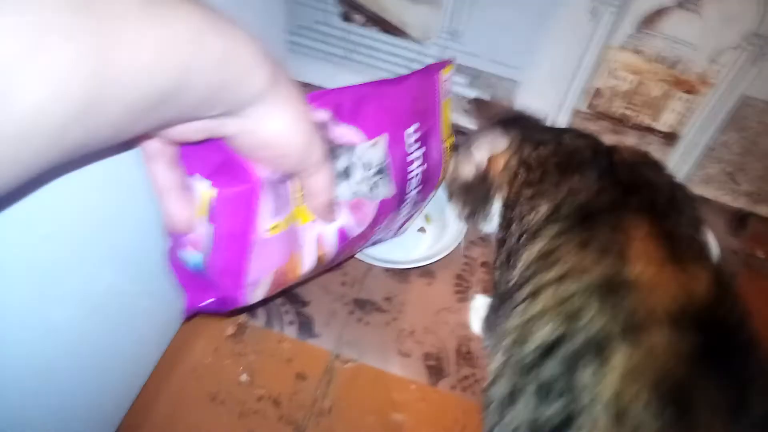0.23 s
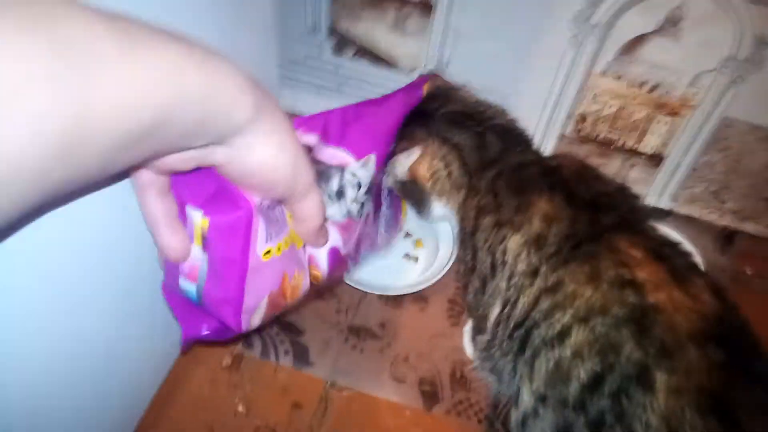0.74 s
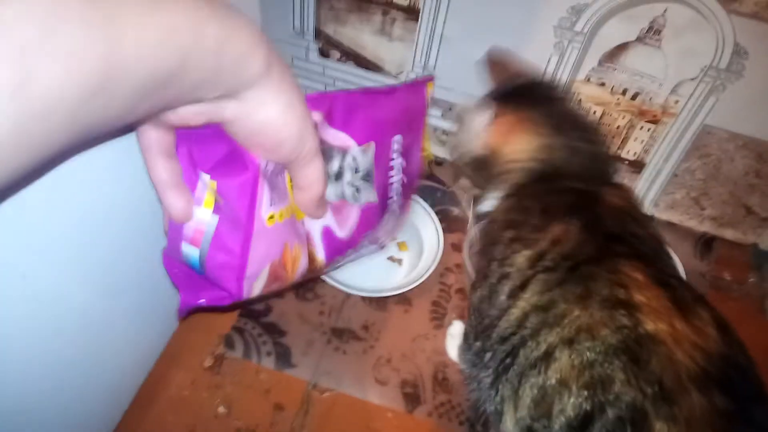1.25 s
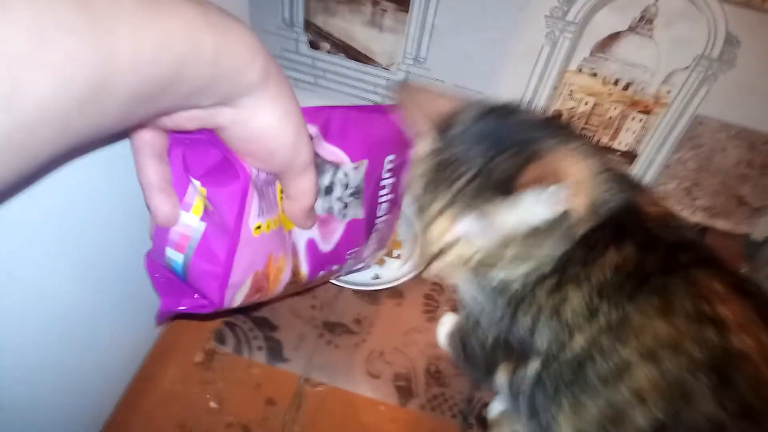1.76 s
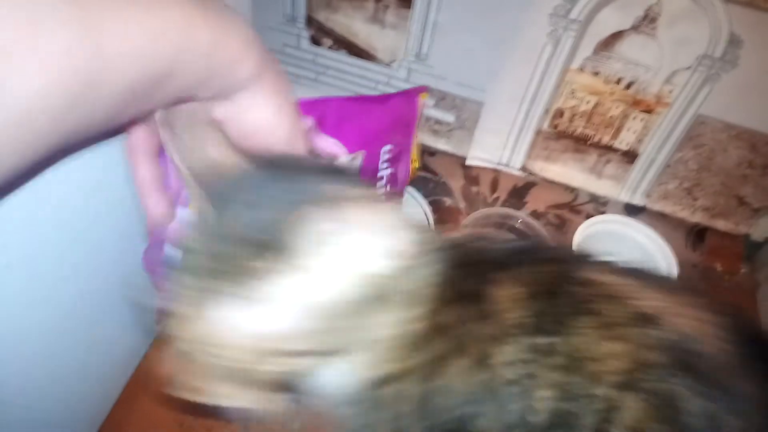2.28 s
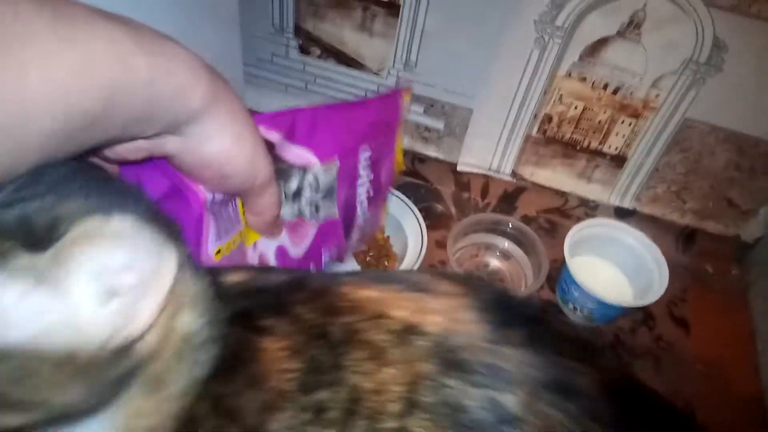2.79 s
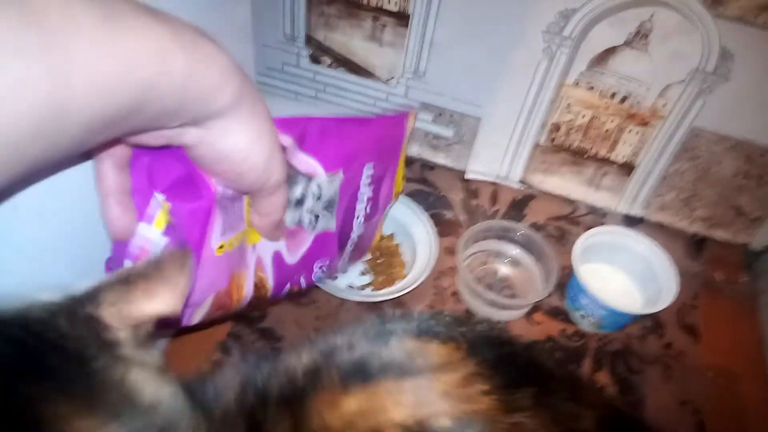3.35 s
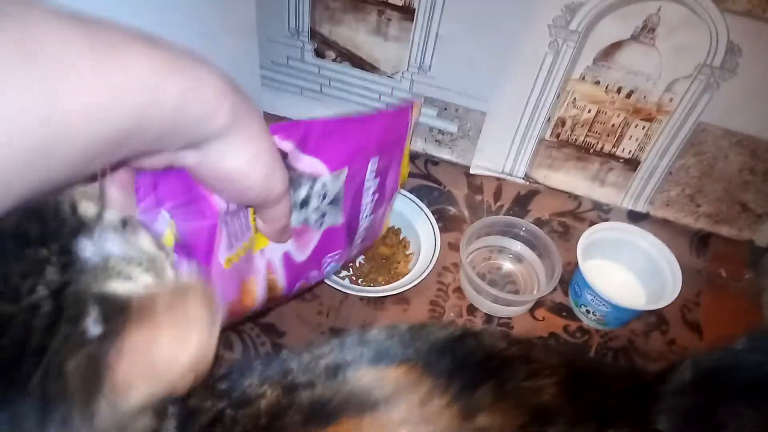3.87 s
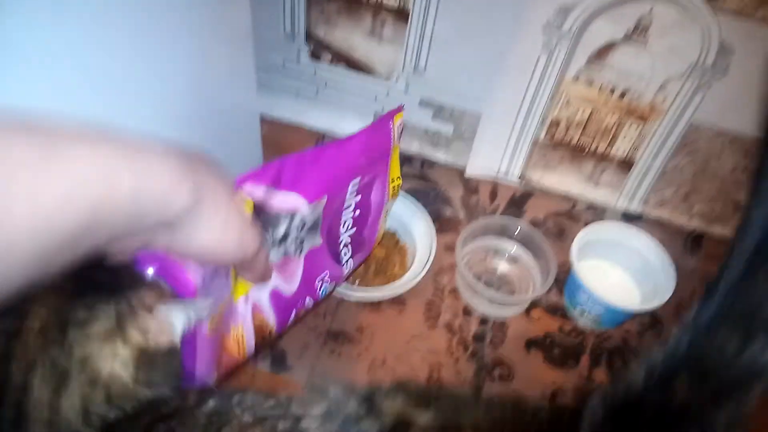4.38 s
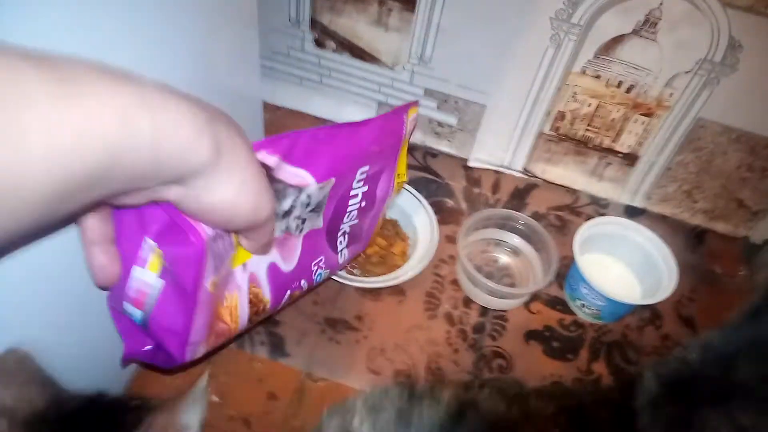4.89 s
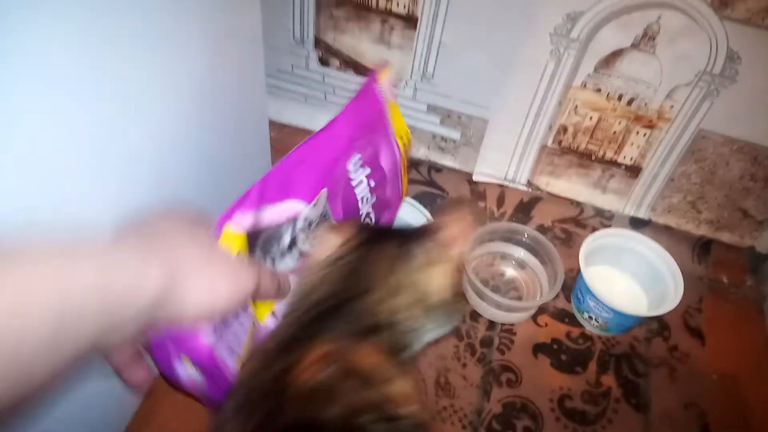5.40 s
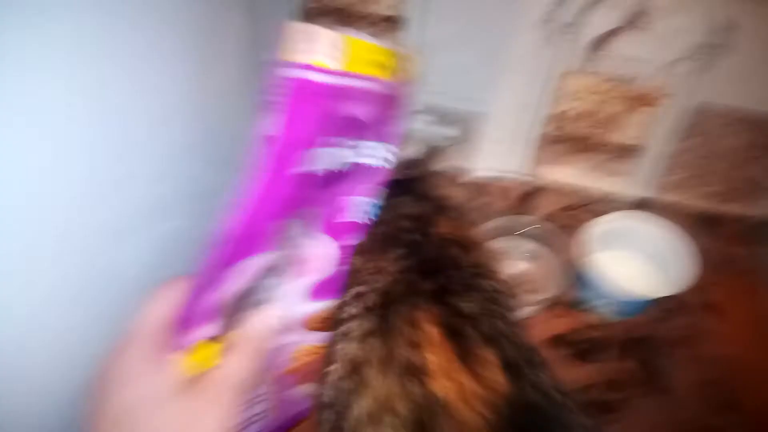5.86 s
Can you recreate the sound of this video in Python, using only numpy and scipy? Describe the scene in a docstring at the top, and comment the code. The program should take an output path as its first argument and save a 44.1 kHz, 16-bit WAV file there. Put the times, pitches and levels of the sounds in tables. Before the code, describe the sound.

Close up in a small quiet room, a plastic pouch of dry cat food is tipped and shaken. Sharp film snaps come first, then kibble slides and rattles in irregular surges while single pellets ping brightly on a china saucer. The densest pour comes just past the middle, with a soft bump after it. Pellets thin out, and the pouch crinkles a few last times as it is lifted.

```python
"""Dry cat food is shaken out of a plastic pouch onto a china saucer in a small room.
Kibble slides along the film as filtered crackle and short knocks; the pouch snaps and crinkles as noise bursts.
Falling pellets ping on the saucer as fading sine tones, and settling ones make fine bright ticks.
The hand rubs the pouch with low noise, and a cat pushing past bumps it with soft low tones."""
import sys
import numpy as np
from scipy import signal
from scipy.fft import rfft, irfft, next_fast_len
from scipy.io import wavfile

SR = 44100
rng = np.random.default_rng(int(sys.argv[2]) if len(sys.argv) > 2 else 0)


def pcm_store(signal):
    """Save signal as 16-bit PCM."""
    levels = np.round(np.clip(np.atleast_2d(signal), -1, 1) * 32767)
    wavfile.write(sys.argv[1], SR, levels.astype(np.int16).T)


N = 270774  # length in samples, about 6.14 s

# Most event and tone levels below are trimmed further by the settings in scene(); the bumps play as typed.
# The quiet room's tone colour. Each row: frequency in Hz, relative level in dB.
AIR_COLOUR = [(25, -14), (50, 0), (110, -0.5), (250, -7), (400, -6.5), (900, -11), (2000, -17), (4500, -16),
              (6200, -21), (8200, -35.5), (12000, -33.5), (15200, -22.5)]
# Each shake sends the kibble sliding; it swells and settles again.
# Each row: crest time in seconds, level in dB, swell time in seconds, settle time in seconds.
SHAKES = [(0.04, -58, 0.25, 0.24), (0.38, -60, 0.33, 0.41), (0.53, -57.5, 0.27, 0.17),
          (0.96, -53, 0.22, .3), (1.12, -49, 0.23, 0.29), (1.32, -49, 0.11, 0.2), (1.5, -48, 0.057, 0.19),
          (1.62, -47.5, 0.086, 0.18), (1.77, -47.5, 0.055, 0.22), (1.89, -40, 0.081, 0.077),
          (2.02, -51.5, 0.2, 0.3), (2.16, -51.5, 0.21, 0.46), (2.44, -53, 0.054, 0.11),
          (2.76, -49, .2, 0.098), (2.88, -57, 0.13, 0.23), (3.13, -44, 0.036, 0.13),
          (3.36, -49.5, 0.083, 0.3), (3.53, -41.5, 0.14, 0.31), (3.78, -51, 0.051, 0.13),
          (3.93, -58, 0.1, 0.35), (4.14, -55, 0.087, 0.34), (4.55, -46.5, 0.086, 0.083),
          (4.66, -48.5, 0.043, 0.099), (4.82, -46, 0.045, 0.27), (5.0, -51.5, 0.037, 0.052),
          (5.14, -52, 0.082, 0.084), (5.53, -63, 0.054, 0.18), (5.8, -50, 0.22, 0.3),
          (6.04, -53, 0.091, 0.073), (6.14, -58.5, 0.041, .1)]
# Tone colour of the sliding kibble. Each row: frequency in Hz, relative level in dB.
KIBBLE_COLOUR = [(300, -15), (600, -12.5), (1000, -7), (1600, 5.5), (2400, 3), (3600, 4.5), (5200, 4),
                 (6300, -6.5), (7200, -19), (8200, -39), (10500, -31.5), (15500, -24)]
# Tone colour of the pouch's hollow rumble. Each row: frequency in Hz, relative level in dB.
HOLLOW_COLOUR = [(150, -27), (280, -13.5), (420, -4), (560, 5.5), (900, 3.5), (1300, 5), (2200, -53.5)]
# The rumble changes as the pouch is tipped and righted.
# Each row: time in seconds, rumble level in dB relative to the flow of kibble.
POUCH_HOLLOWNESS = [(0, -6), (1.25, -7), (2.0, -12.5), (2.7, -7.5), (3.55, -11.5), (4.0, -14.5),
                    (4.7, -13.5), (5.15, -24), (5.6, -3), (6.14, 1)]
# Handfuls land on the food in the saucer.
# Each row: crest time in seconds, level in dB, swell time in seconds, settle time in seconds.
SPILLS = [(1.87, -66, 0.062, .15), (2.06, -68, .09, 0.16), (3.42, -59, .07, 0.27), (3.58, -55, 0.074, 0.3),
          (4.95, -69, 0.14, 0.46)]
# Tone colour of pellets ticking on the saucer. Each row: frequency in Hz, relative level in dB.
TICK_COLOUR = [(5000, -20), (7000, -3), (8200, -26), (10200, -21.5), (11300, -13.5), (13500, -11),
               (15250, -2), (15550, -14), (15900, -15)]
# The hand shifts its grip. Each row: crest time in seconds, level in dB.
GRIP_SHIFTS = [(1.12, -62), (2.08, -64.5), (2.72, -59.5), (3.17, -54), (3.47, -61), (3.65, -62.5),
               (4.22, -66), (4.97, -63.5), (5.78, -65)]
# Tone colour of the rubbing hand. Each row: frequency in Hz, relative level in dB.
HAND_COLOUR = [(25, -43), (60, -17.5), (110, -2.5), (220, -3.5), (330, -8), (700, -43)]
# Pellets hit the saucer; the spot decides which groups of tones answer.
# Each row: start in seconds, ping level in dB, lower chime level in dB, top sparkle level in dB.
PELLETS = [(0.003, -48.5, -72, -63), (0.0715, -59, -78, -63), (0.092, -47.5, -55.5, -55),
           (0.3356, -49.5, -61, -60), (1.1675, -32.5, -65, -42), (1.2324, -49.5, -44.5, -55),
           (1.369, -48.5, -66, -53), (1.4107, -49.5, -50.5, -70), (1.5837, -55.5, -38.5, -71),
           (1.6651, -48, -64, -84), (1.7374, -53.5, -55, -60), (1.8348, -34, -59, -57),
           (2.0113, -55, -44, -66), (2.0358, -55, -46, -54), (2.0848, -59, -46.5, -61),
           (2.52, -57.5, -58, -58), (2.7135, -46, -60, -50.5), (2.7498, -44, -48, -54),
           (2.8, -55, -42.5, -65), (2.8595, -55, -45, -48.5), (3.1854, -61, -49.5, -47),
           (3.2072, -56.5, -48, -48), (3.3718, -40, -56.5, -48), (3.4232, -30.5, -63, -45),
           (3.4845, -55, -50, -48), (3.5503, -43, -33.5, -42), (3.6027, -35, -41, -50),
           (3.6692, -38, -45, -52), (3.7672, -37, -52, -60), (3.7785, -42.5, -64, -50),
           (3.949, -69, -51, -69.5), (3.997, -61, -42.5, -51), (4.0588, -46.5, -27, -45),
           (4.205, -56, -59, -70), (4.5335, -53, -38.5, -56), (4.574, -74, -49.5, -79),
           (4.9187, -57, -71, -64), (5.0295, -53.5, -52, -52)]
# The saucer's natural tones come in three groups; each hit varies them a little.
# Each row: frequency in Hz, level in dB, typical time to fade by 60 dB in seconds.
CHIME_TONES = [(1890, -19.5, 0.17), (4380, 3.5, 0.064), (4392, -16.5, 0.2), (9000, -29, 0.091),
               (10940, -21, 0.14), (12050, -23.5, 0.053)]
PING_TONES = [(7019, 2, 0.11), (6985, -14, .14), (11300, -18, .1)]
SPARKLE_TONES = [(11220, -5.5, 0.086), (13100, -6.5, 0.088), (15235, -11, 0.082)]
# The pouch buckles with a snap. Each row: start in seconds, level in dB, hollow body in dB relative
# to that level, sharp edge in dB relative to that level, crease pitch in Hz.
SNAPS = [(0.3045, -39, -46, -24, 2100), (0.4474, -23.5, -29, -11.5, 3040),
         (0.4628, -22.5, -22.5, -17.5, 1420), (0.5375, -35, -25, -16, 4430),
         (0.5477, -21.5, -22.5, -24.5, 1440), (0.7365, -36.5, -15.5, -35, 1200),
         (0.8122, -19.5, -15.5, -6, 2780), (0.9087, -17.5, -27, -7, 6140), (1.037, -28, -14, -7.5, 950),
         (1.0995, -26, -25, -16, 2560), (1.1395, -33, -25, -31, 2530), (1.3663, -40.5, -16, -17, 2000),
         (1.3786, -32.5, -29, -16.5, 2070), (1.508, -34.5, -29, -14, 2360), (1.5918, -36.5, -14, -12, 830),
         (1.6323, -34.5, -21, -34, 2480), (1.8966, -32.5, -18.5, -11.5, 2400),
         (2.0339, -27.5, -67, -23.5, 4900), (2.1895, -36.5, -36, -19, 3100),
         (2.5494, -33.5, -24.5, -12.5, 1120), (2.7427, -32.5, -25, -14, 2140),
         (3.1021, -40, -19, -23, 1880), (3.1145, -25, -30, -11.5, 1930), (3.3216, -39, -40, -14, 2070),
         (3.4014, -29.5, -38, -21, 4030), (3.7275, -37, -49, -15, 1630), (4.1805, -26.5, -29, -20, 3170),
         (4.2429, -41, -21, -10, 4470), (4.4317, -43.5, -31, -14, 2580), (4.5104, -28.5, -68, -9.5, 2000),
         (4.5342, -32.5, -24, -5, 4460), (4.6491, -36, -43, -10.5, 3560), (4.6624, -38, -22.5, -8, 3600),
         (4.865, -37.5, -29.5, -11, 3750), (4.9761, -44, -29, -6.5, 3200), (5.581, -35, -23, -21.5, 1070),
         (5.673, -32, -14, -22.5, 1170), (5.7146, -22, -23.5, -10.5, 3210), (5.801, -37, -23, -4.5, 1660),
         (5.8197, -30, -18.5, -21, 1660), (5.9259, -37, -8.5, -28, 880), (5.9432, -35, -15, -22, 960),
         (6.0427, -46, -16, -17, 764)]
# Tone colour of the snapping film. Each row: frequency in Hz, relative level in dB.
FILM_COLOUR = [(60, -37), (130, -6.5), (250, -11.5), (400, -10.5), (650, -3.5), (1400, -4), (2100, -3.5),
               (3000, -4.5), (4400, 3.5), (6200, -7), (7200, -15.5), (8300, -26), (12500, -28.5),
               (15500, -19)]
# Soft bumps. Each row: start in seconds, level in dB, pitch in Hz, time to fade by 60 dB in seconds.
BUMPS = [(.737, -31.5, 970, 0.016), (0.814, -26, 192, 0.024), (1.077, -53, 145, 0.19),
         (1.081, -34.5, 246, 0.05), (3.17, -49.5, 224.7, 0.38), (4.140, -47, 94, 0.25),
         (4.152, -24, 122, 0.035), (4.163, -32, 177, 0.09), (4.183, -41, 110, .08),
         (4.183, -43, 414, 0.019), (5.818, -43.5, 152, 0.11)]
# Stray pellets drop while the mouth of the pouch is down: it holds start in seconds, end in seconds.
POURING = (1.15, 3.9)
# How long the room's echo lasts. Each row: frequency in Hz, time to fade by 60 dB in seconds.
ROOM_FADE = [(150, 0.62), (1000, 0.21), (5000, 0.14), (14000, 0.1)]

# swell and settle are the times a surge takes to cross this range
SURGE_RANGE_DB = 20
SWELL_CURVE = 1.96  # above 1: a surge starts steeply and rounds off at its crest
POUCH_HZ, POUCH_Q, POUCH_RING_DB = 1617, 18, -5  # the open pouch rings faintly at one pitch
HOLD_DB = -74  # the hand just holding on, before the grip trim
RUB_SWELL_S, RUB_SETTLE_S = 0.093, 0.13
# small creases flip at random while the kibble moves, the louder the more it moves
CRINKLES_PER_S, CRINKLE_OVER_SLIDE_DB, CRINKLE_SPREAD_DB = 9, 4, 3
CRINKLE_BODY_DB, CRINKLE_EDGE_DB = -21.5, -6.5  # relative to the crinkle's level, before trims
CRINKLE_HZ, CRINKLE_PITCH_SCATTER = 2260, 0.35
# levels relative to the flow of kibble, before trims
STRAYS_PER_S, STRAY_PING_DB, STRAY_CHIME_DB, STRAY_SPARKLE_DB = 7, -7, -3.5, -11.5
TOP_HZ = 15900


def amp(db):
    """Turn decibels into gain."""
    return 10 ** (np.asarray(db) / 20)


def unit(x):
    """Scale to an average strength (rms) of 1."""
    return x / np.sqrt(np.mean(x ** 2) + 1e-20)


def along(points, hz):
    """Read between (Hz, value) points on a log frequency axis."""
    f, v = np.transpose(points)
    return np.interp(np.log(hz + 1), np.log(f + 1), v)


def curves(rows):
    """Give one value per sample for each column after the time."""
    s, *cols = np.transpose(rows)
    return [np.interp(np.arange(N) / SR, s, c) for c in cols]


def add(track, s, sound):
    """Mix a sound into the track at time s."""
    start = max(round(s * SR), 0)
    track[start:start + len(sound)] += sound[:len(track) - start]


def coloured(x, spectrum):
    """Filter to the given (Hz, dB) outline without smearing backwards in time (minimum phase)."""
    m = 2 * next_fast_len(len(x) // 2 + 2048)
    gain = amp(along(spectrum, np.fft.rfftfreq(m, 1 / SR)))
    cepstrum = irfft(np.log(gain))
    # folding the second half onto the first makes the filter respond only after its input
    cepstrum[1:m // 2] *= 2
    cepstrum[m // 2 + 1:] = 0
    return irfft(rfft(x, m) * np.exp(rfft(cepstrum)), m)[:len(x)]


def crackle(rate, spread_db, t60):
    """Tiny contacts at random moments and of uneven size, each a brief noise burst; rms 1."""
    sizes = amp(spread_db * np.minimum(rng.standard_normal(N), 2.4))
    energy = (rng.random(N) < rate / SR) * sizes ** 2
    # energy falls by 120 dB on the amp scale while the sound falls by 60 dB
    fading = signal.lfilter([1], [1, -amp(-120 / (t60 * SR))], energy)
    return unit(np.sqrt(fading) * rng.standard_normal(N))


def surges(rows):
    """Gain of events that start briskly and die away evenly in dB; their powers add."""
    t, power = np.arange(N) / SR, np.zeros(N)
    for s, db, swell, settle in rows:
        before = np.abs((s - t) / max(swell, 0.01)) ** SWELL_CURVE
        after = (t - s) / max(settle, 0.01)
        below = np.where(t < s, before, after)
        power += amp(db - SURGE_RANGE_DB * np.minimum(below, 10)) ** 2
    return np.sqrt(power)


def chance_moments(flow, per_s, start, end):
    """Loosely spaced rows of (s, dB of the flow at that moment, two normal draws)."""
    draws = rng.standard_normal((200, 2))
    times = start + (np.arange(len(draws)) + rng.random(len(draws))) / per_s
    return [(s, 20 * np.log10(flow[int(s * SR)]), a, b) for s, (a, b) in zip(times, draws) if s < end]


def quiet_air(level_db):
    """The quiet room is a steady, faint coloured noise."""
    return amp(level_db) * unit(coloured(rng.standard_normal(N), AIR_COLOUR))


def sliding(flow, rustle_db, knock_db, hollow_db):
    """Pellets tumble over each other and over the film; the pouch adds a hollow rumble."""
    fine = unit(coloured(crackle(rate=420, spread_db=2, t60=0.06), KIBBLE_COLOUR))
    bumping = knocks(rate=140, spread_db=0, centre_hz=2580, scatter=0.3527, cycles=7.9)
    coarse = unit(coloured(bumping, KIBBLE_COLOUR))
    dull = unit(coloured(crackle(rate=220, spread_db=0, t60=0.04), HOLLOW_COLOUR))
    rustle = amp(rustle_db) * (fine + amp(knock_db) * coarse)
    rumble = amp(curves(POUCH_HOLLOWNESS)[0] + hollow_db) * dull
    return flow * (rustle + rumble)


def knocks(rate, spread_db, centre_hz, scatter, cycles):
    """Single pellets bump the film, each with three short tones around a pitch of its own."""
    onsets = np.flatnonzero(rng.random(N) < rate / SR)
    t = np.arange(SR // 60) / SR
    draws = rng.standard_normal((N, 5))[onsets]
    # one draw shifts all the tones of a pellet, three more spread them apart
    pitches = centre_hz * np.exp(scatter * (draws[:, :1] + draws[:, 1:4]))
    hz = np.clip(pitches, 500, 7000)[..., None]
    tones = (np.sin(2 * np.pi * hz * t) * np.exp(-hz * t / cycles)).sum(1)
    sizes = amp(spread_db * np.minimum(draws[:, 4:], 1.6))
    places = onsets[:, None] + np.arange(len(t))
    return np.bincount(places.ravel(), (sizes * tones).ravel(), N)[:N]


def pouch_ring(x):
    """The sliding kibble and the snaps also sound the pouch's resonance."""
    return x + amp(POUCH_RING_DB) * signal.lfilter(*signal.iirpeak(POUCH_HZ, POUCH_Q, SR), x)


def skitter(flow, level_db, trickle_db):
    """Fine bright ticks of pellets settling in the saucer: a trickle with every shake, a rush with every spill."""
    landing = np.hypot(amp(trickle_db) * flow, surges(SPILLS))
    ticks = unit(coloured(crackle(rate=210, spread_db=0.5, t60=0.036), TICK_COLOUR))
    return amp(level_db) * landing * ticks


def rubbing(grip_db):
    """The hand rubs the pouch as low crackle that swells whenever the grip shifts."""
    shifts = [(s, db, RUB_SWELL_S, RUB_SETTLE_S) for s, db in GRIP_SHIFTS]
    grip = np.hypot(amp(HOLD_DB), surges(shifts))
    return amp(grip_db) * grip * unit(coloured(crackle(rate=160, spread_db=5.5, t60=0.18), HAND_COLOUR))


def saucer(rows, chime_db, ping_db, sparkle_db, tick_db, rise, vary_db, detune, damping, bounce_s, bounce_db):
    """Each pellet ticks on the china, rings its natural tones and bounces once, more softly."""
    out, t = np.zeros(N), np.arange(SR // 4) / SR
    for s, ping, chime, sparkle in rows:
        # each group: its tones, its level in dB, the random spread of its levels in dB
        families = ((CHIME_TONES, chime + chime_db, 1), (PING_TONES, ping + ping_db, 1),
                    (SPARKLE_TONES, sparkle + sparkle_db, vary_db))
        bounce_delay = bounce_s * (0.5 + rng.random())
        for delay, strength_db in (0, 0), (bounce_delay, bounce_db):
            tick = coloured(rng.standard_normal(len(t)), TICK_COLOUR)
            ring = amp(sparkle + tick_db - 60 * t / 0.016) * tick
            for modes, db, vary in families:
                for hz, level, t60 in modes:
                    # the food lying in the saucer detunes and damps it differently each time
                    shift, size, life = rng.standard_normal(3)
                    phase = 2 * np.pi * (hz * (1 + detune * shift) * t + rng.random())
                    fade_db = 60 * t / (t60 * np.exp(damping * life))
                    ring += amp(db + level + vary * size - fade_db) * np.sin(phase)
            add(out, s + delay, amp(strength_db) * ring * (1 - np.exp(-t / rise)))
    return out


def crinkles(flow):
    """Rows for small snaps of the film, set off by the moving kibble."""
    return [(s, db + CRINKLE_OVER_SLIDE_DB + CRINKLE_SPREAD_DB * size, CRINKLE_BODY_DB, CRINKLE_EDGE_DB,
             CRINKLE_HZ * np.exp(CRINKLE_PITCH_SCATTER * pitch))
            for s, db, size, pitch in chance_moments(flow, CRINKLES_PER_S, 0, N / SR)]


def snaps(rows, level_db, rise, crack_t60, flutter_db, flutter_t60, body_db, edge_db, crease_db, crease_q, crinkle_db):
    """A crease flips with a crack and rings at its own pitch; the film around it crinkles on."""
    out, t = np.zeros(N), np.arange(SR // 6) / SR
    knots = np.arange(0, t[-1], 0.0015)  # a new random crinkle level every 1.5 ms
    crack = amp(-60 * t / crack_t60)
    flutter = amp(flutter_db - 60 * t / flutter_t60)
    shape = (1 - np.exp(-t / rise)) * np.hypot(crack, flutter)
    for s, db, body, edge, hz in rows:
        wobble = np.interp(t, knots, rng.standard_normal(len(knots)))
        crinkle = amp(crinkle_db * wobble * np.minimum(t / 0.0063, 1))
        burst = shape * crinkle * rng.standard_normal(len(t))
        burst = burst + amp(crease_db) * signal.lfilter(*signal.iirpeak(hz, crease_q, SR), burst)
        # (Hz, dB): the body sets the low end, the edge sets the treble
        lean = [(500, body + body_db), (1300, 0), (3000, 0.014), (5000, edge + edge_db)]
        add(out, s, amp(db + level_db) * coloured(burst, lean))
    return coloured(out, FILM_COLOUR)


def bumps(rise):
    """Each soft bump is a sine tone that starts quickly and fades."""
    out, t = np.zeros(N), np.arange(SR // 3) / SR
    for s, db, hz, t60 in BUMPS:
        add(out, s, amp(db - 60 * t / t60) * (1 - np.exp(-t / rise)) * np.sin(2 * np.pi * hz * t))
    return out


def strays(flow, spread_db):
    """Rows for light pellets that trickle out at random during the pour."""
    return [(s, db + STRAY_PING_DB + spread_db * a, db + STRAY_CHIME_DB + spread_db * b, db + STRAY_SPARKLE_DB)
            for s, db, a, b in chance_moments(flow, STRAYS_PER_S, *POURING)]


def room(x):
    """The hard walls answer with a fading noise tail; the treble dies first."""
    hz, t, z = signal.stft(rng.standard_normal(SR // 2), SR, nperseg=256)
    fade = amp(-60 * t / along(ROOM_FADE, hz)[:, None])
    tail = signal.istft(z * fade, SR, nperseg=256)[1]
    tail = np.pad(tail / np.linalg.norm(tail), (SR // 250, 0))  # the answer starts about 4 ms late
    return signal.fftconvolve(x, tail)[:N]


def scene():
    """Pouch, saucer and hand in the quiet room; the flow of kibble drives many of the small sounds."""
    flow = surges(SHAKES)
    air = quiet_air(level_db=-68.5)
    pouch = sliding(flow, rustle_db=-4.0, knock_db=0.0, hollow_db=0.0)
    china = skitter(flow, level_db=3, trickle_db=-42)
    hand = rubbing(grip_db=3.5) + bumps(rise=0.0018)
    creases = list(SNAPS) + crinkles(flow)
    pellets = list(PELLETS) + strays(flow, spread_db=5.5)
    pouch = pouch + snaps(creases, level_db=9, rise=0.001, crack_t60=0.025, flutter_db=-24.0, flutter_t60=0.067,
                          body_db=20.5, edge_db=8, crease_db=6.5, crease_q=6.4, crinkle_db=3.5)
    pouch = pouch_ring(pouch)
    china = china + saucer(pellets, chime_db=1.5, ping_db=-2.0, sparkle_db=1.5, tick_db=13, rise=0.00028,
                           vary_db=0.5, detune=0.0026, damping=0.45, bounce_s=0.0072, bounce_db=-8.5)
    walls = amp(-8.5) * room(pouch) + amp(-15.0) * room(china) + amp(-12.5) * room(hand)
    return (pouch + china + hand + walls + air)[None]


def record(dry):
    """Keep nothing above the top frequency."""
    m = next_fast_len(N + SR // 2)
    kept = np.fft.rfftfreq(m, 1 / SR) < TOP_HZ
    return irfft(rfft(dry, m) * kept, m)[..., :N]


dry = scene()
out = record(dry)
pcm_store(out)
```